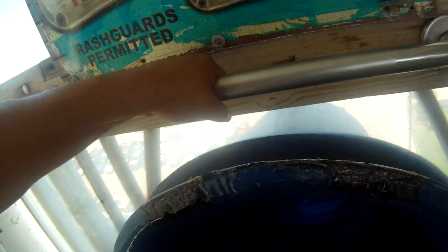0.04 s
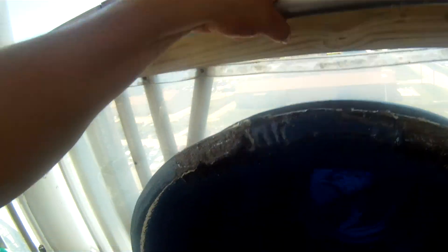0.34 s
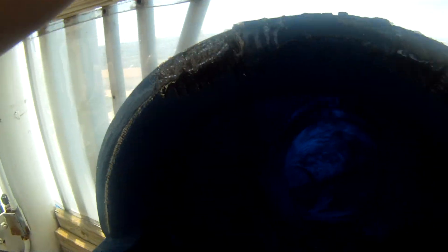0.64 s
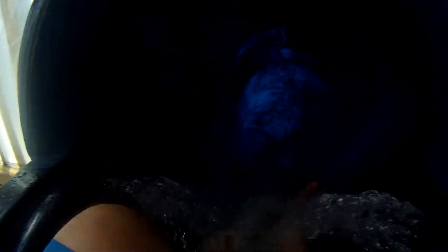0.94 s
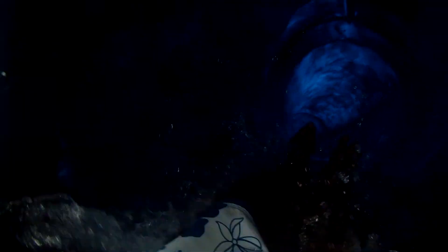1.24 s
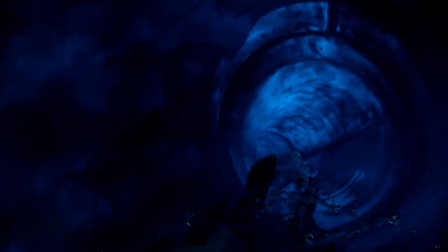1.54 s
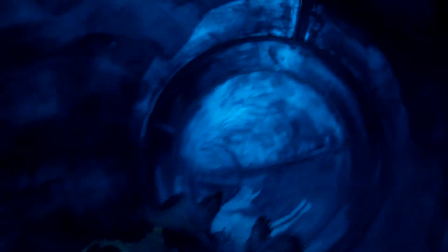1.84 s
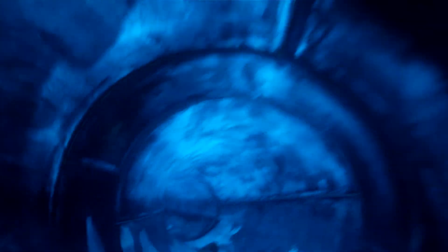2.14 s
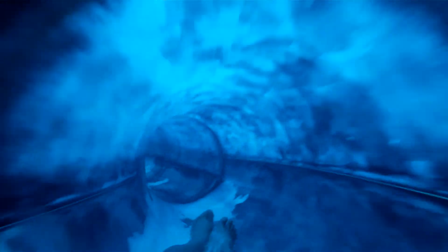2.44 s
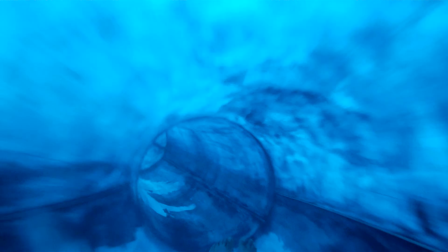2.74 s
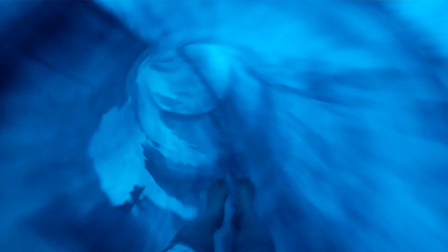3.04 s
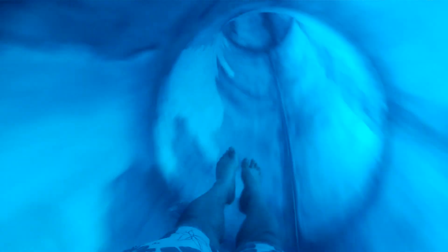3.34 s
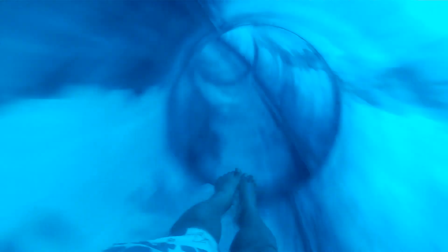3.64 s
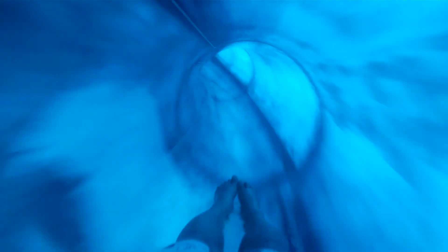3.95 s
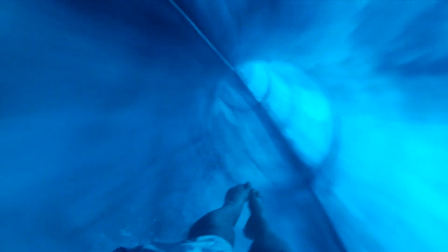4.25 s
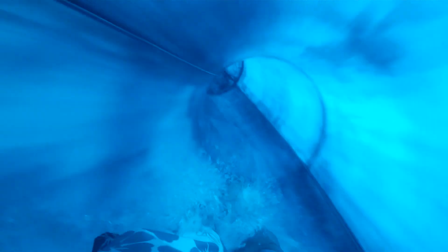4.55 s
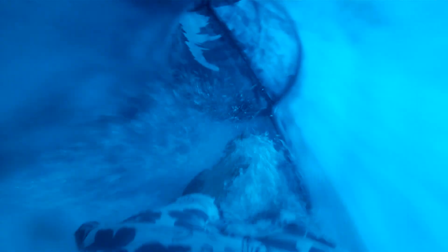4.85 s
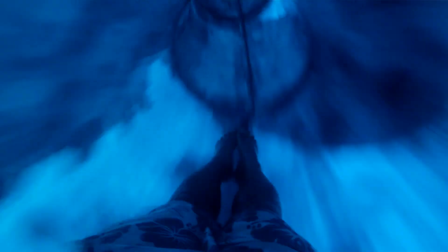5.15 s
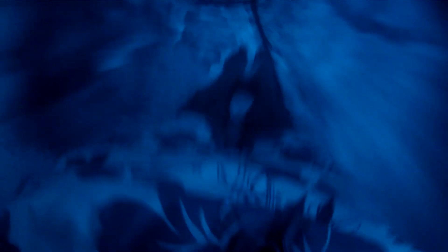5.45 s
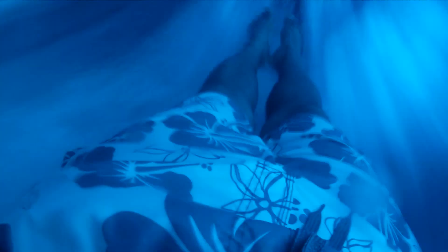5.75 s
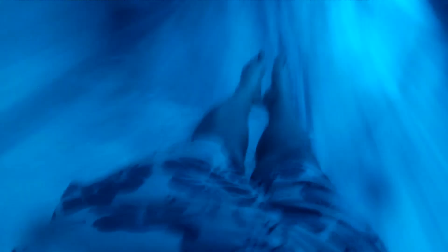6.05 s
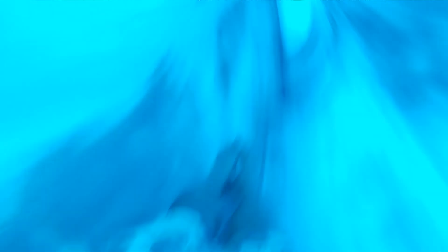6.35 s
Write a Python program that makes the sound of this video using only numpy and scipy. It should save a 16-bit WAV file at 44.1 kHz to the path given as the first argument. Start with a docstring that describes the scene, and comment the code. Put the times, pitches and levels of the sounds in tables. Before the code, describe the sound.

A ride down a tube water slide: hollow rushing water grows into rumbling churn, with bumps and one sharp, loud slap.

```python
"""Inside an enclosed water slide, a rider pushes off holding a waterproof camera.
Water rushes in the hollow tube; with speed it churns under the rider and buffets the camera's case.
Splashes gulp, bumps thump the case, and drops hit the microphone's opening (the port) and change
its ring. One slap of water overloads it. The camera holds each sample at a low rate, which mirrors
the sound into a fizzy treble."""
import sys
import numpy as np
from scipy import signal
from scipy.fft import rfft, irfft, next_fast_len
from scipy.io import wavfile
from scipy.ndimage import uniform_filter1d, map_coordinates

SR = 44100
rng = np.random.default_rng(int(sys.argv[2]) if len(sys.argv) > 2 else 0)


def put_to_file(sound):
    """Save the sound as 16-bit audio at rate SR, in the file named by the first command-line argument."""
    columns = np.atleast_2d(sound).T  # one column per channel
    safe = np.clip(columns, -1, 1)
    whole_steps = np.round(safe * 32767)
    wavfile.write(sys.argv[1], SR, whole_steps.astype(np.int16))


N = 287091

# how loud the water rushes: t/s, level/dB
RUSH_LEVEL = [(0, -34), (.25, -35.5), (1.04, -34.5), (1.25, -31.5), (1.7, -31), (1.9, -29.8), (2.36, -28.5),
              (2.6, -29), (3.0, -32), (3.85, -30), (4.25, -31.5), (4.7, -29), (5.05, -29), (5.22, -31),
              (5.62, -26.5), (5.9, -29), (6.3, -28.5), (6.45, -30.5)]
# tone of the rushing water: f/Hz, level/dB
RUSH_SPECTRUM = [(150, -14), (400, -15), (600, -12), (780, -6), (1050, -9), (1500, -1.5), (1750, 0.5),
                 (2000, 1.24), (2400, -0.8), (2800, -0.5), (3550, 1), (4200, -4.5), (5300, -4.5),
                 (8000, -12)]
# tone of the deep churning: f/Hz, level/dB
CHURN_SPECTRUM = [(50, -19), (130, 0.5), (220, 4.5), (320, -1.5), (400, -4.5), (520, -2.5), (900, -4.5),
                  (2000, -33)]
# pitches that the tube lifts or weakens: f/Hz, width/Hz, gain/dB
TUBE_BANDS = [(198, 120, -12), (390, 43, 2.5), (492, 45, 4), (1230, 150, 0), (1450, 150, 0.5),
              (1690, 140, -3.5), (2140, 120, 2.5), (2804, 230, 5), (3200, 130, -5), (3850, 320, -6.5),
              (4430, 270, -5)]
# how much of the water sounds hollow, most at the tube's mouth: t/s, share
HOLLOW_SHARE = [(0, 1), (1.7, 0.53), (2.45, 0.96), (3.0, 0.32), (4.2, 0.17), (6.5, 0.059)]
# the tube's main ring as the rider goes in: t/s, f/Hz
TUBE_PITCH = [(0, 748), (1.3, 704), (2.0, 770), (2.5, 814), (3.2, 800)]
# films of water on the port: start t/s, ring f/Hz, drift/(Hz/s), ring gain/dB, notch gain/dB
WATER_FILMS = [(0, 2580, 0, 2.5, -4), (1.8, 2680, 0, 6.5, -2), (2.4, 1980, -64, 6, -11),
               (4.05, 2050, 300, 3.5, 2), (4.55, 2230, -100, 7, 0.5), (4.85, 1970, -3, 5, -2.5),
               (5.58, 2270, -3, 8.5, -0.5), (5.88, 2150, 0, 0.5, -1)]
# how fast the rider goes: t/s, share of top speed
RIDER_SPEED = [(0, 0.14), (.7, 0.24), (1.1, 0.38), (2.0, 0.39), (2.35, 0.62), (3.45, 0.51), (3.7, 0.78),
               (4.3, 0.59), (5.4, 0.75), (5.6, 1), (6.5, 0.88)]
# tone of the rumble on the case: f/Hz, level/dB
RUMBLE_SPECTRUM = [(10, -13.5), (26, 4), (42, 2), (80, -7.5), (140, -12.5), (300, -26.5), (800, -73)]
# sheets of water thrown up by the rider: t/s, lift of the rush/dB
WATER_SHEETS = [(1.065, 4.5), (1.48, 1.5), (1.83, 1.5), (2.0, 2), (2.235, 3), (4.965, 1.5), (5.58, 1.5)]
# bumps and gusts that push on the case: t/s, level/dB, swing f/Hz
CASE_BUMPS = [(1.110, -32, 29.8), (1.200, -32, 33), (1.732, -34, 70), (2.233, -16.5, 47.3),
              (2.337, -17.5, 79.5), (2.409, -18.5, 58.7), (2.726, -20, 43), (2.771, -20, 63),
              (3.373, -26, 91), (3.578, -19.5, 82.5), (3.645, -20.5, 100), (4.008, -14.5, 42),
              (4.328, -25, 37.8), (4.862, -19, 54), (5.673, -13, 49), (5.830, -18, 35), (6.139, -10, 45),
              (6.177, -15, 33.8), (6.298, -11.5, 51), (6.326, -18, 32), (6.463, -16, 42)]
# splashes that trap a gulp of air: t/s, level/dB, bubble f/Hz
AIR_GULPS = [(1.288, -20.5, 773), (1.606, -23.5, 846), (1.769, -23, 1470), (1.908, -21.5, 1540),
             (2.324, -16.5, 730), (2.399, -17.5, 822), (4.328, -23, 1980), (5.944, -15, 1550)]
# tone of those splashes: f/Hz, level/dB
SPLASH_SPECTRUM = [(300, -14), (700, 1), (1100, -2), (1600, 0), (3200, 0), (5000, -16)]
# fine drops on the port: t/s, level/dB, ring f/Hz
FINE_DROPS = [(1.9140, -17, 1600), (2.3250, -12, 2000), (2.4003, -7, 2350), (2.4022, -6.5, 3100),
              (2.5735, -18, 2000), (4.9963, -6.5, 2450), (5.1513, -4.5, 2800), (5.5696, -1, 2300),
              (5.5706, -0.5, 2750), (5.9462, -11, 4200), (5.9565, -14, 3000)]
# the port's tones: multiple of the ring pitch, level/dB, time to fade by 60 dB (t60)/s
PORT_MODES = [(.62, -3, 0.012), (1, 9, 0.0073), (1.2, 9, 0.0045), (1.52, 3.5, 0.0024)]
# heavy drops on the case: t/s, level/dB, ring f/Hz
HEAVY_DROPS = [(2.7068, -21, 420), (2.7630, -10.5, 736), (3.6680, -16.5, 720), (3.7330, -11, 760),
               (3.8081, -8.5, 740), (3.8633, -14, 700), (3.8847, -15, 690), (3.9060, -19, 720)]
# the two hits of the big slap: t/s, level/dB, ring f/Hz
SLAP_HITS = [(4.0361, 28, 950), (4.0375, 33, 1500)]

INLET_DB, INLET_FADE_S = -48.5, 2.7  # the water inlet churns, and is left behind at the tube's mouth
PLOUGH_S, PLOUGH_RISE_S, CHURN_DB = 2.87, 0.94, -10.5  # the rider's churn; dB relative to RUSH_LEVEL
TUBE_RING_WIDTH_HZ, TUBE_RING_DB, TUBE_WAVER_HZ = 94, 8, 19
FILM_WIDTH_HZ, NOTCH_WIDTH_HZ, NOTCH_RATIO, FILM_FADE_S = 227, 200, 1.204, 0.025
RUMBLE_DB, SLOSH_RISE_S = -26.5, 0.021  # rumble at top speed; time for a sheet of water to peak
INPUT_EDGE_HZ, HOLD_HZ, TOP_HZ = 5600, 12000, 15400  # treble cut, sampling rate, final treble cut


def amp(db):
    """Turn decibels into a factor to multiply by."""
    return 10 ** (np.asarray(db) / 20)


def unit(x):
    """Scale to an average strength (rms) of 1."""
    return x / np.sqrt(np.mean(x ** 2) + 1e-20)


def clock(count=N):
    """Sample times in seconds."""
    return np.arange(count) / SR


def add(track, s, sound):
    """Mix a sound into a track, starting at s seconds."""
    part = track[max(round(s * SR), 0):][:len(sound)]
    part += sound[:len(part)]


def curve(points):
    """Join (time, value) points with straight lines."""
    return np.interp(clock(), *np.transpose(points))


def wobble(rate):
    """A smooth curve through rate random values a second."""
    return map_coordinates(rng.standard_normal(int(N * rate / SR) + 4), [clock() * rate])


def filtered(x, response):
    """Multiply each frequency f in x by response(f)."""
    size = next_fast_len(N + SR // 2)
    return irfft(rfft(x, size) * response(np.fft.rfftfreq(size, 1 / SR)), size)[:N]


def coloured(x, spectrum):
    """Shape the tone of x by (Hz, dB) points, at strength 1."""
    hz, db = np.transpose(spectrum)
    return unit(filtered(x, lambda f: amp(np.interp(np.log(f + 1), np.log(hz), db))))


def bell(f, hz, width):
    """A hump of height 1 around hz, half as high at the edges of its width."""
    return .5 ** ((2 * (f - hz) / width) ** 2)


def moving_band(x, hz, width):
    """Keep the part of x near a moving pitch, given as one hz value for each sample."""
    phase = 2 * np.pi * np.cumsum(hz) / SR
    waves = np.cos(phase), np.sin(phase)
    return 2 * sum(wave * filtered(x * wave, lambda f: bell(f, 0, width)) for wave in waves)


def bubbles(rate, low_hz, high_hz, cycles, spread_db, brightness=0):
    """A cloud of short rings; each rises in pitch as its bubble nears the surface."""
    when, pitch, faintness = rng.random((int(rate * N / SR), 3)).T[:, :, None]
    hz = low_hz * (high_hz / low_hz) ** pitch
    t = clock(int(min(cycles / low_hz, .03) * SR))
    age = t * hz / cycles
    strength = hz ** brightness * amp(-spread_db * np.log(.01 + faintness))
    rings = strength * np.exp(-5 * age) * np.sin(2 * np.pi * hz * t * (1 + .1 * age))
    index = (when * N).astype(int) + np.arange(len(t))
    return unit(np.bincount(index.ravel(), rings.ravel(), N)[:N])


def tube_echo(x, t60, echo_db):
    """The hard tube walls answer with a dense, fading echo."""
    t = clock(SR // 2)
    tail = rng.standard_normal(len(t)) * amp(-60 * t / t60)
    echo = signal.fftconvolve(x, tail / np.linalg.norm(tail))[:N]
    return unit(x + amp(echo_db) * echo)


def rushing_water():
    """The stream hisses, bubbles and splatters down the tube."""
    clumps = amp(1.2 * wobble(45))  # drops arrive in handfuls
    babble = bubbles(rate=2000, low_hz=440, high_hz=4540, cycles=21.4, spread_db=3.5, brightness=0.53)
    babble = tube_echo(babble, t60=0.34, echo_db=-2.5)
    splatter = clumps * bubbles(rate=2500, low_hz=1810, high_hz=5500, cycles=1.06, spread_db=2)
    rush = coloured(rng.standard_normal(N) + amp(-5) * babble + amp(-5.5) * splatter, RUSH_SPECTRUM)
    return rush * amp(curve(RUSH_LEVEL) + sloshing() + 0.4 + 0.27 * wobble(28))


def churning_water():
    """Water churns low, first at the inlet and later as the rider ploughs through it."""
    inlet = amp(INLET_DB) * np.clip(1 - clock() / INLET_FADE_S, 0, 1) ** .5
    plough = np.clip((clock() - PLOUGH_S) / PLOUGH_RISE_S, 0, 1) * amp(curve(RUSH_LEVEL) + CHURN_DB)
    churn = coloured(rng.standard_normal(N), CHURN_SPECTRUM)
    return churn * (inlet + plough) * amp(1.9 * wobble(16))


def hollow_tube(x):
    """The tube's hollow, wavering ring gives way to the water right beside the rider."""
    share = np.clip(curve(HOLLOW_SHARE), 0, 1)
    ring_hz = curve(TUBE_PITCH) + TUBE_WAVER_HZ * wobble(12)
    ring = (amp(TUBE_RING_DB) - 1) * moving_band(x, ring_hz, TUBE_RING_WIDTH_HZ)
    hollow = filtered(x, lambda f: amp(sum(db * bell(f, hz, width) for hz, width, db in TUBE_BANDS)))
    return (1 - share) * x + share * (hollow + ring)


def wet_port(x):
    """Each film of water tunes the port, drifting as it drains or fills, until the next replaces it."""
    def fade(steps):
        return uniform_filter1d(steps, int(FILM_FADE_S * SR))

    films = np.array(WATER_FILMS)
    current = np.maximum(np.searchsorted(films[:, 0], clock()) - 1, 0)
    start, hz, drift, ring_db, notch_db = films[current].T
    ring_hz = fade(hz + drift * (clock() - start))
    ring = fade(amp(ring_db) - 1) * moving_band(x, ring_hz, FILM_WIDTH_HZ)
    # most films also weaken a band just above the ring
    notch = fade(amp(notch_db) - 1) * moving_band(x, ring_hz * NOTCH_RATIO, NOTCH_WIDTH_HZ)
    return x + ring + notch


def buffeting():
    """Air and water shove the case: a lumpy rumble that grows with the square of speed."""
    rumble = coloured(rng.standard_normal(N), RUMBLE_SPECTRUM)
    lumps = amp(2.7 * wobble(13))
    return amp(RUMBLE_DB) * curve(RIDER_SPEED) ** 2 * unit(rumble * lumps)


def sloshing():
    """Decibels added to the rush as each sheet of water rises fast and falls back."""
    lift = np.zeros(N)
    for s, db in WATER_SHEETS:
        age = np.maximum(clock() - s, 0) / SLOSH_RISE_S
        lift += db * age * np.exp(1 - age)
    return lift


def bumps():
    """Each bump or gust thumps the case with one heavy swing."""
    out, t = np.zeros(N), clock(SR // 5)
    middle = t.mean()
    for s, db, hz in CASE_BUMPS:
        turns = (middle - t) * hz
        swing = np.sin(2 * np.pi * turns) * np.exp(-(turns / 0.48) ** 2)
        add(out, s - middle, amp(db + 2.5) * swing)
    return out


def gulps():
    """A puff of splash traps one larger bubble, whose pitch climbs as it dies."""
    out, t = np.zeros(N), clock(SR // 8)
    splash = coloured(rng.standard_normal(N), SPLASH_SPECTRUM)
    swell = (1 - np.exp(-t / 0.0026)) * amp(-60 * t / 0.055)
    for s, db, hz in AIR_GULPS:
        bubble = np.sin(2 * np.pi * hz * t * (1 + 0.23 * t))
        puff = splash[round(s * SR):][:len(t)]
        add(out, s, amp(db) * swell * (0.75 * bubble + 1.07 * puff))
    return out


def fine_drops():
    """Small drops snap on the port: a tiny crack, and the port's own tones ring."""
    out, t = np.zeros(N), clock(SR // 30)
    hiss = coloured(rng.standard_normal(N), [(700, -22), (2000, -1), (5000, -4), (8000, 3)])
    for s, db, hz in FINE_DROPS:
        ring = sum(amp(level - 60 * t / t60) * np.sin(2 * np.pi * hz * ratio * t)
                   for ratio, level, t60 in PORT_MODES)
        crack = 1.1 * hiss[round(s * SR):][:len(t)] * amp(-60 * t / 0.0029)
        snap = (ring + crack) * (1 - np.exp(-t / 0.00011))
        add(out, s, amp(db - 0.5) * snap / np.abs(snap).max())
    return out


def plop(hz, t60, push_hz, push_t60, push_db):
    """Water lands on the camera: a short hollow ring over one low push."""
    t = clock(SR // 10)
    ring = np.sin(2 * np.pi * hz * t) * amp(-60 * t / t60) * (1 - np.exp(-t / 0.00039))
    push = np.sin(2 * np.pi * push_hz * t) * amp(-60 * t / push_t60)
    return 2 * ring - amp(push_db) * push


def heavy_drops():
    """Big drops plop on the case."""
    out = np.zeros(N)
    for s, db, hz in HEAVY_DROPS:
        add(out, s, amp(db - 1) * plop(hz, t60=0.0099, push_hz=115, push_t60=0.023, push_db=-3.5))
    return out


def slap():
    """A lump of water lands twice on the port, far louder than the camera can take."""
    out = np.zeros(N)
    for s, db, hz in SLAP_HITS:
        add(out, s, amp(db) * plop(hz, t60=.0016, push_hz=150, push_t60=.013, push_db=-4))
    return out


def sample_and_hold(x):
    """Slow sampling in steps mirrors the sound to both sides of the sampling rate, as fizz."""
    narrow = filtered(x, lambda f: 1 / np.sqrt(1 + (f / INPUT_EDGE_HZ) ** 50))
    mirrored = narrow * (1 + 2 * np.cos(2 * np.pi * HOLD_HZ * clock()))
    return filtered(mirrored, lambda f: np.sinc(f / HOLD_HZ))  # holding softens the treble


def overload(x):
    """Peaks that are too loud are cut flat; the camera turns itself down, then climbs back."""
    release_db_per_s, attack_s = 185, .004
    over_db = 20 * np.log10(np.maximum(np.abs(x), 1))
    climb = release_db_per_s * clock()
    dip_db = np.maximum.accumulate(over_db + climb) - climb
    # the dip comes a little late, so the first milliseconds pass at full level
    lag = np.exp(-1 / (attack_s * SR))
    dip_db = signal.lfilter([(1 - lag) ** 2], np.poly([lag, lag]), dip_db)
    return np.clip(x, -1, 1) * amp(-dip_db)


def scene():
    """Everything as it reaches the microphone inside the case, in one channel."""
    water = wet_port(hollow_tube(rushing_water() + churning_water()))
    return (water + buffeting() + bumps() + gulps() + fine_drops() + heavy_drops() + slap())[None]


def record(dry):
    """The camera overloads, adds its fizz and cuts off the highest treble."""
    heard = np.clip(sample_and_hold(overload(dry[0])), -1, 1)
    return filtered(heard, lambda f: 1 / np.sqrt(1 + (f / TOP_HZ) ** 400))[None]


dry = scene()
out = record(dry)
put_to_file(out)
```